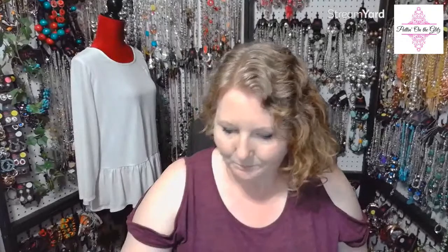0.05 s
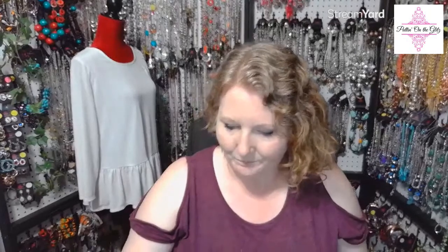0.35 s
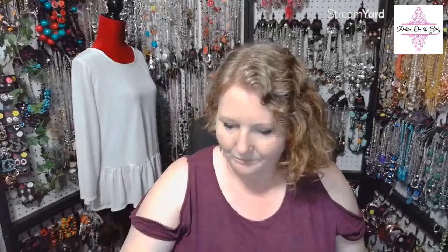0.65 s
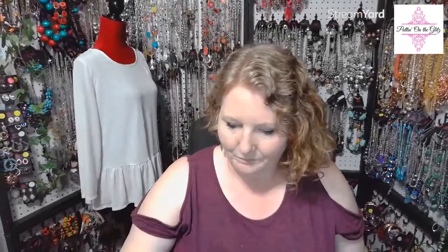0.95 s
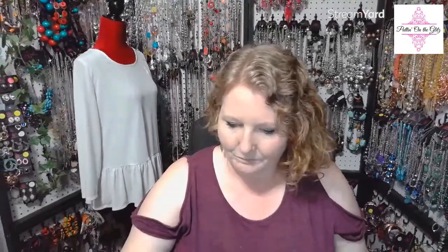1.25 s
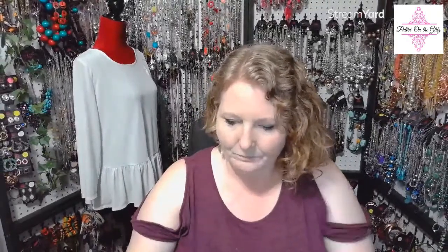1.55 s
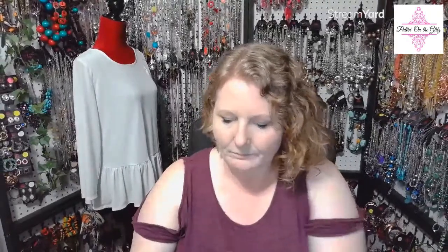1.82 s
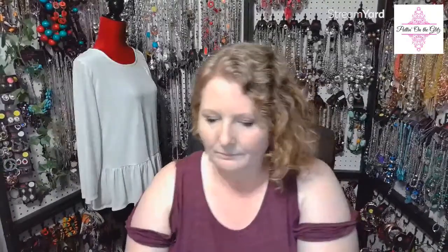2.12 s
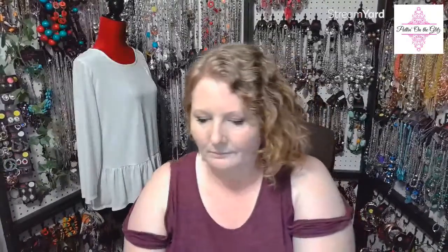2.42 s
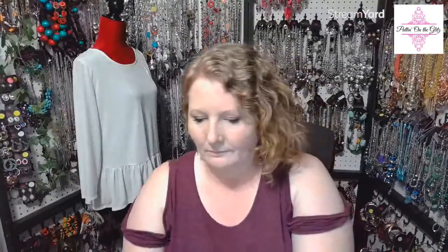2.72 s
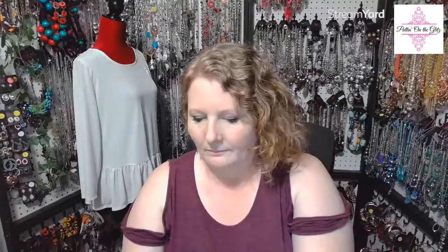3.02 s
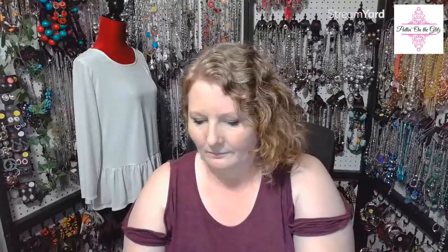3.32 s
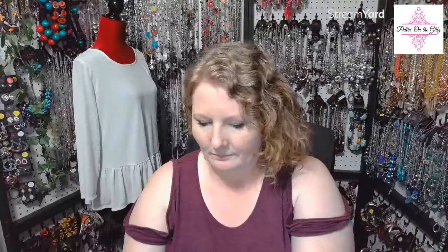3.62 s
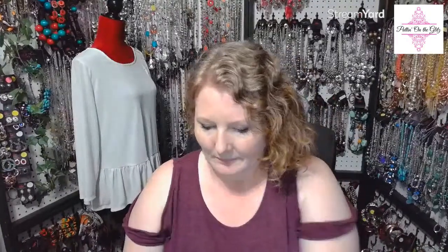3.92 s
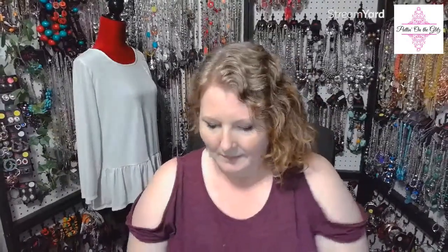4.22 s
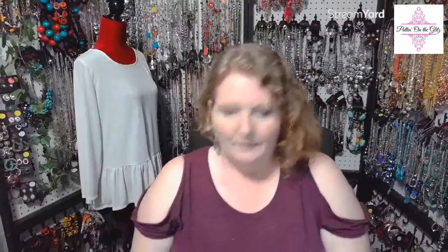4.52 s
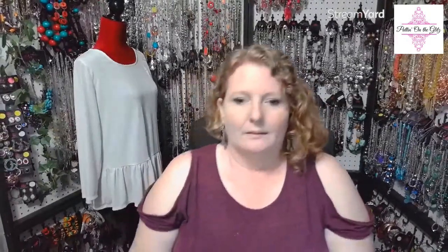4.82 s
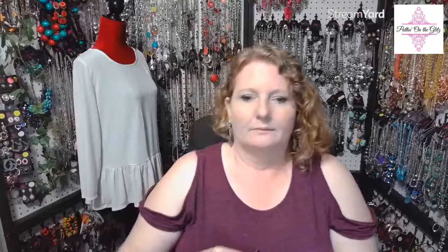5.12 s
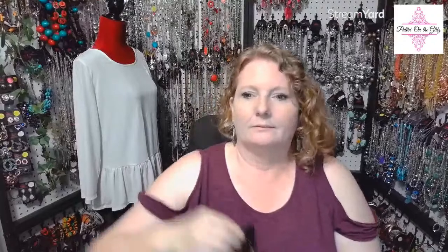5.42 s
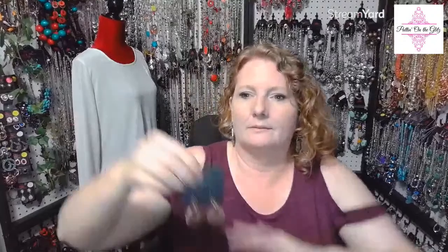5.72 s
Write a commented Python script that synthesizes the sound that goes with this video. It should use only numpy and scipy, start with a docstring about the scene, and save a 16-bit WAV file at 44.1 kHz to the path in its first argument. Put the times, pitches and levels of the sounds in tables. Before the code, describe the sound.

Close, dry handling of jewelry on stiff cards: short scrapes, ticks and taps on a tabletop, then tiny metal drops chiming together.

```python
"""Sorting earrings on a table

Earrings on display cards are sorted by hand, close up, in a small, well-damped room. The cards slide,
tick and knock on the table top, small metal parts ping and the hand bumps the board now and then.
At the end one card is lifted and its two dangling metal drops chime against each other."""
import sys
import numpy as np
from scipy import signal
from scipy.fft import rfft, irfft
from scipy.io import wavfile

SR = 44100
rng = np.random.default_rng(int(sys.argv[2]) if len(sys.argv) > 2 else 0)


def int16_out(signal):
    """Quantize to a 16-bit WAV file."""
    q = np.round(np.clip(np.atleast_2d(signal).T, -1, 1) * 32767)
    wavfile.write(sys.argv[1], SR, q.astype(np.int16))


N = 258184
CUTOFF_HZ = 16000


def from_db(db):
    """Decibels to gain."""
    return 10 ** (np.asarray(db) / 20)


def rms_one(x):
    """Scale to rms 1."""
    return x / np.sqrt(np.mean(x ** 2) + 1e-20)


def unit_energy(x):
    """Scale to a sum of squares of 1."""
    return x / np.sqrt(np.sum(x ** 2) + 1e-20)


def seconds(length):
    """A time axis."""
    return np.arange(int(length * SR)) / SR


def fade(t, t60):
    """Exponential decay, 60 dB in t60."""
    return np.exp(-np.log(1000) * t / t60)


def add(track, start_s, sound):
    """Mix a sound into the track."""
    at = max(int(start_s * SR), 0)
    track[at:at + len(sound)] += sound[:N - at]


def band(x, low_hz, high_hz, order=2):
    """Butterworth band-pass."""
    sos = signal.butter(order, [low_hz, min(high_hz, .45 * SR)], "band", fs=SR, output="sos")
    return signal.sosfilt(sos, x + 1e-18)


def resonate(x, modes):
    """Parallel resonances (pitch [Hz], width [Hz], gain [dB]) with alternating signs."""
    out = 0
    for k, (hz, width, db) in enumerate(modes):
        r = np.exp(-np.pi * width / SR)
        poles = [1, -2 * r * np.cos(2 * np.pi * hz / SR), r * r]
        mode = (1 - r * r) / 2 * signal.lfilter([1, 0, -1], poles, x + 1e-18)
        out = out + (-1) ** k * from_db(db) * mode
    return out


def drift(per_s):
    """A smooth random wobble with rms 1."""
    knots = rng.standard_normal(N // 20)
    return rms_one(np.interp(np.arange(N) / SR * per_s, np.arange(len(knots)), knots))


def ring(hz, t60, rise_s=0.0011):
    """One struck mode, swelling while the contact lasts and then dying away."""
    t = seconds(.45)
    attack = 1 - np.exp(-(t / rise_s) ** 2)
    return np.sin(2 * np.pi * (hz * t + rng.random())) * fade(t, t60) * attack


def jingle(low_hz, high_hz, t60, count):
    """A cluster of inharmonic modes of wire and thin metal."""
    pitches = low_hz * (high_hz / low_hz) ** ((np.arange(count) + rng.random(count)) / count)
    heights = rng.rayleigh(1, count)
    cluster = sum(height * ring(hz, t60) for height, hz in zip(heights, pitches))
    return cluster / np.sqrt(np.sum(heights ** 2) / 2)


def room_tone(noise_db=-70):
    """A steady bed of room noise, microphone hiss and faint mains hum."""
    # noise spectrum: (frequency [Hz], relative density [dB])
    spectrum = [(30, -13), (70, -6.5), (130, -5), (250, -4), (400, -12.5), (600, -17), (1200, -21),
                (2500, -25), (4500, -24.5), (8000, -25.5), (11000, -24.5), (16000, -24)]
    # mains harmonics: (pitch [Hz], rms level [dB])
    harmonics = [(60, -93.5), (120, -80.5), (180, -82), (241, -79), (301, -79)]
    corner_hz, corner_db = np.transpose(spectrum)
    bins_hz = np.fft.rfftfreq(N, 1 / SR) + 1
    colour = from_db(np.interp(np.log(bins_hz), np.log(corner_hz), corner_db))
    noise = rms_one(irfft(rfft(rng.standard_normal(N)) * colour, N))
    t = np.arange(N) / SR
    hum = sum(from_db(db) * np.sin(2 * np.pi * (hz * t + rng.random())) for hz, db in harmonics)
    return from_db(noise_db) * noise + np.sqrt(2) * hum


def reflections(x, predelay_s=0.0014, crossover_hz=3500):
    """Dense reflections from the table and the crowded walls die quickly."""
    t = seconds(.3)
    low = band(rng.standard_normal(len(t)), 100, crossover_hz) * fade(t, t60=0.099)
    high = band(rng.standard_normal(len(t)), crossover_hz, CUTOFF_HZ) * fade(t, t60=0.11)
    return signal.fftconvolve(x, unit_energy((low + high) * (t > predelay_s)))[:N]


def hand_bumps(t60=0.075, rise_s=0.0062, trim_db=-3, shudder_db=-9):
    """Soft bumps move only the lowest modes of the table and leave it shuddering briefly."""
    # the hand meets the table: (time [s], relative level [dB])
    bumps = [(0.596, -42.5), (3.56, -35.5), (3.697, -34.5), (3.953, -37)]
    out, t = np.zeros(N), seconds(.45)
    for start, db in bumps:
        shudder = rms_one(band(rng.standard_normal(len(t)), 75, 300)) * fade(t, t60=0.25)
        thud = ring(172, t60, rise_s) + 0.42 * ring(228, t60, rise_s)
        add(out, start, from_db(db + trim_db) * (thud + from_db(shudder_db) * shudder))
    return out


def table_top(force, place_spread_db, wood_db=-7):
    """The board answers with a few modes over a woody band; where it is struck shifts their balance."""
    # resonances of the board: (pitch [Hz], width [Hz], relative gain [dB])
    board_modes = [(172.8, 170, -15.5), (242, 46, -7), (330, 130, -14.5), (584, 390, -15.5),
                   (780.4, 41, 2.5), (864, 70, 2), (1018, 220, -7), (1218, 45, 0.5), (1314, 120, -2.5)]
    modes = [(hz, width, db + place_spread_db * rng.standard_normal()) for hz, width, db in board_modes]
    wood = from_db(wood_db) * band(force, 470, 1600, order=3)
    return band(resonate(force, modes) + wood, 90, 2400)


def card(force):
    """Stiff cards ring briefly in the upper mids."""
    # resonances of a display card: (pitch [Hz], width [Hz], relative gain [dB])
    card_modes = [(2490, 3560, 7.5), (3300, 1030, 14.5), (3900, 1700, 8.5), (5400, 1600, -0.5)]
    return band(resonate(force, card_modes), 1700, 7400, order=3)


def edges(force, sheen_db=-11, air_db=-20):
    """Hooks and card edges give the crisp top end, strongest in its lower part."""
    sheen = from_db(sheen_db) * band(force, 7950, 12500, order=4)
    air = from_db(air_db) * band(force, 12500, CUTOFF_HZ, order=4)
    return band(force, 6290, 9310, order=4) + sheen + air


def friction(catches_per_s, spread_db, smooth_db, judder_db):
    """A stream of tiny uneven catches over smooth noise, juddering with the pressure of the fingers."""
    sizes = from_db(spread_db * np.minimum(rng.exponential(1, N), 4.5)) * rng.choice([-1, 1], N)
    catches = rms_one(sizes * (rng.random(N) < catches_per_s / SR))
    smooth = from_db(smooth_db) * rng.standard_normal(N)
    return (catches + smooth) * from_db(judder_db * drift(per_s=110))


def loose_parts(force, low_hz, high_hz, width_hz, count, direct=.7, contact_spread_db=5):
    """Narrow resonances of the many small parts come and go as they touch and lift."""
    detune = from_db(rng.normal(0, 0.19, count))  # about 2 % either way
    pitches = np.geomspace(low_hz, high_hz, count) * detune
    contact_db = [contact_spread_db * np.clip(drift(per_s=24), -2, 1.5) for _ in pitches]
    rings = sum(resonate(force, [(hz, width_hz, 0)]) * from_db(db) for hz, db in zip(pitches, contact_db))
    return direct * rms_one(force) + rms_one(rings)


def rubs(half_width=0.078, trim_db=1):
    """A piece drags lightly, swelling and fading in one narrow resonance."""
    # light drags: (start [s], end [s], pitch [Hz], relative level [dB])
    drags = [(0.55, 0.725, 876, -45), (1.162, 1.27, 4020, -38), (2.256, 2.55, 2250, -61.5),
             (2.56, 2.76, 2200, -63), (2.593, 2.668, 3300, -59.5), (4.206, 4.262, 866, -51),
             (4.211, 4.276, 2960, -45), (4.243, 4.545, 1500, -70.5), (4.572, 4.715, 2190, -74),
             (4.655, 4.743, 3020, -68), (5.05, 5.216, 2200, -68.5), (5.347, 5.48, 2450, -72),
             (5.478, 5.579, 3160, -60)]
    out = np.zeros(N)
    force = friction(catches_per_s=2500, spread_db=1, smooth_db=3.5, judder_db=3.5)
    for start, end, hz, db in drags:
        rub = band(force[int(start * SR):int(end * SR)], hz * (1 - half_width), hz * (1 + half_width))
        swell = signal.windows.tukey(len(rub), .7)
        add(out, start, from_db(db + trim_db) * rms_one(rub) * swell)
    return out


def stroke_envelopes(attack_s=.012, sag_db_per_s=20, release_t60=0.11):
    """Scrape and table gains: each stroke gets going, loses pressure and dies once the fingers stop."""
    # a card is pushed or pulled: (start [s], length [s], relative scrape [dB], relative table body [dB])
    strokes = [(0, 0.097, -33.5, -37.5), (0.096, 0.047, -39, -45), (0.204, 0.18, -56, -66),
               (0.351, 0.064, -43.5, -47), (0.395, 0.039, -30.5, -49), (0.445, 0.068, -35, -42.5),
               (0.539, 0.08, -37, -44), (.62, 0.15, -40, -49.5), (.745, .11, -38, -47),
               (0.87, 0.053, -47.5, -59.5), (0.941, 0.34, -48, -62.5), (1.125, 0.083, -39, -50.5),
               (1.171, 0.06, -38, -46.5), (1.523, 0.08, -59, -75.5), (1.641, 0.029, -55, -66),
               (1.728, 0.13, -53.5, -57), (1.803, 0.064, -40.5, -37.5), (1.884, 0.058, -50.5, -47.5),
               (1.998, 0.016, -62, -71), (2.143, .05, -58, -67.5), (2.205, 0.04, -50, -56),
               (2.239, 0.15, -61, -61.5), (2.415, 0.014, -48, -54.5), (2.487, 0.041, -48.5, -58.5),
               (2.579, 0.08, -61, -68), (2.701, 0.078, -49, -64), (2.839, 0.034, -57, -59),
               (2.894, 0.058, -66.5, -78), (2.988, 0.036, -51.5, -48.5), (3.109, .15, -63.5, -71.5),
               (3.28, 0.01, -51, -78), (3.424, 0.13, -48.5, -64), (3.53, 0.047, -34, -36.5),
               (3.602, 0.084, -36.5, -41), (3.638, 0.11, -38, -46.5), (3.79, 0.15, -58, -60.5),
               (3.914, 0.048, -43, -51.5), (3.976, 0.029, -47.5, -67), (4.094, 0.12, -66, -76),
               (4.192, 0.06, -47.5, -57), (4.255, 0.012, -34.5, -63), (4.34, 0.041, -73, -88),
               (4.595, .1, -72, -74.5), (4.689, .03, -57.5, -82), (5.086, 0.28, -71, -71.5),
               (5.201, 0.038, -54.5, -63), (5.232, 0.079, -42, -54.5), (5.427, 0.17, -67.5, -68.5),
               (5.665, 0.13, -73.5, -78)]
    scrape_power, body_power, t = np.zeros(N), np.zeros(N), seconds(.6)
    hold = np.minimum(t / attack_s, 1) * from_db(-sag_db_per_s * t)
    for start, length, scrape_db, body_db in strokes:
        shape = hold * fade(np.maximum(t - length, 0), release_t60)
        add(scrape_power, start, (from_db(scrape_db) * shape) ** 2)
        add(body_power, start, (from_db(body_db) * shape) ** 2)
    return np.sqrt(scrape_power), np.sqrt(body_power)


def small_ticks(scrape_gain, per_s=18, stroke_db=-2.5, finger_db=-68.5, spread_db=6, wire_db=-5):
    """Random dry ticks, faint from the fingers and stronger as a card moves; each rings an ear wire."""
    out, t = np.zeros(N), seconds(.06)
    range_hz = (1900, 6500)
    strength = from_db(stroke_db) * scrape_gain + from_db(finger_db)
    for at in np.flatnonzero(rng.random(N) < per_s / SR):
        gain = strength[at] * from_db(spread_db * rng.standard_normal())
        tick = rms_one(band(rng.standard_normal(len(t)), *range_hz)) * fade(t, t60=0.0092)
        wire = from_db(wire_db) * jingle(*range_hz, t60=0.037, count=4)
        add(out, at / SR, gain * tick)
        add(out, at / SR, gain * wire)
    return out


def sliding(scrape_gain, body_gain, scrape_db=-4.5, body_db=-4, hiss_db=-10):
    """Friction drives the cards, the table under them and the jewellery on them."""
    force = friction(catches_per_s=1800, spread_db=3, smooth_db=-10.5, judder_db=2)
    high_rattle = loose_parts(force, 1683, 11000, width_hz=120, count=40)
    low_rattle = loose_parts(force, 403, 2000, width_hz=150, count=12)
    board = table_top(rms_one(force) + .5 * rms_one(low_rattle), place_spread_db=0.5)
    scrape = from_db(scrape_db) * rms_one(card(high_rattle))
    hiss = from_db(hiss_db) * rms_one(edges(high_rattle, sheen_db=-12.5, air_db=-13.5))
    return scrape_gain * (scrape + hiss) + body_gain * from_db(body_db) * rms_one(board)


def clicks(crumble=0.68, width_hz=900, card_share=0.028, click_trim_db=-1, wire_db=-12, hook_db=-5):
    """Each touch is a spike with a crumbling tail, fed to card, table and edges; wires and hooks ring."""
    # cards and metal fittings touch down, with relative levels:
    # (time [s], contact resonance [Hz], click [dB], table knock [dB], treble snap [dB])
    touches = [(.0256, 4200, -35, -53, -45), (0.0472, 3750, -27.5, -33, -62), (.0714, 3700, -44, -43, -61),
               (.126, 3040, -29.5, -35, -37), (0.1397, 2720, -40, -49, -66),
               (0.1559, 3500, -36.5, -40.5, -43.5), (0.236, 3840, -32.5, -45.5, -63),
               (0.2482, 4700, -34, -44.5, -49), (0.289, 2900, -41.5, -50.5, -53.5),
               (.316, 4000, -48, -58, -62), (.3696, 4700, -37.5, -48, -53.5), (.3934, 3380, -39, -46, -54),
               (.4152, 4320, -33.5, -35, -46), (.4194, 4480, -22, -29, -38.5),
               (0.4336, 4290, -23.5, -30.5, -42.5), (0.5717, 3630, -27, -40, -47),
               (.5954, 3620, -29, -33, -62), (.638, 3950, -30.5, -43.5, -47), (.679, 2810, -38, -38, -45),
               (0.744, 3460, -34.5, -42.5, -56), (.969, 5940, -40, -74, -47),
               (.9814, 4660, -43.5, -74, -54), (1.0466, 3900, -41, -52.5, -71),
               (1.0917, 3900, -41, -51, -57), (1.1555, 3800, -41, -69, -41.5),
               (1.1624, 3990, -29, -42.5, -54), (1.1991, 3920, -36, -45, -35.5),
               (1.241, 4080, -50, -45.5, -35), (1.2978, 3880, -44, -82, -60), (1.565, 5070, -48, -78, -75),
               (1.614, 4030, -49.5, -67, -62), (1.6643, 5460, -44.5, -52, -49.5),
               (1.8162, 3730, -32, -28.5, -39.5), (1.8243, 2900, -36.5, -35, -58.5),
               (1.854, 3700, -36.5, -31.5, -46), (2.0211, 4330, -48, -60, -55.5),
               (2.22, 3700, -42, -46, -51.5), (2.2776, 2340, -51, -55.5, -66),
               (2.767, 2790, -35, -49.5, -54), (2.7717, 2670, -35.5, -60, -53.5),
               (2.8423, 4010, -59, -50, -67), (2.8597, 1830, -37.5, -39.5, -70),
               (2.997, 1980, -52, -57, -60), (3.0146, 2380, -47.5, -45.5, -47.5),
               (3.0287, 2000, -35, -56, -56), (3.0914, 4200, -57, -64, -63),
               (3.152, 4280, -51.5, -60.5, -64), (3.2908, 3600, -43.5, -49.5, -53),
               (3.3141, 2020, -50.5, -46.5, -65), (3.4454, 2680, -38, -57, -61.5),
               (3.471, 3150, -36.5, -58, -55.5), (3.521, 2300, -36, -41, -60),
               (3.5322, 4600, -33, -39, -58), (3.5541, 4470, -18, -34, -41),
               (3.5619, 4300, -39.5, -34, -50), (3.6155, 2970, -41, -42.5, -59),
               (3.629, 5000, -32.5, -41, -47), (3.662, 3170, -27, -32, -38),
               (3.6804, 3900, -25.5, -47, -44.5), (3.6888, 3130, -49.5, -24.5, -48.5),
               (3.7077, 2500, -29, -35, -61.5), (3.7222, 2560, -34, -33.5, -55.5),
               (3.7596, 3650, -40, -53.5, -56), (3.941, 2630, -41.5, -45.5, -58),
               (3.994, 5610, -45.5, -76, -59), (4.208, 3580, -49, -55, -64),
               (4.2611, 3320, -30, -48.5, -42), (4.2671, 2520, -32.5, -46, -47.5),
               (4.356, 3880, -56, -66, -64), (4.369, 3750, -59, -69.5, -62), (4.4, 3630, -66, -68, -78),
               (4.468, 5180, -45, -76, -59), (4.992, 2960, -60, -65.5, -76), (5.085, 3020, -63, -70.5, -77),
               (5.2434, 3970, -56, -56, -45.5), (5.271, 5670, -55, -63, -56), (5.3235, 3180, -34, -45, -49),
               (5.429, 3300, -52.5, -75, -68)]
    out, t = np.zeros(N), seconds(.08)
    hit_gain = np.sqrt(.004 * SR)  # gives unit energy the weight of 4 ms at rms 1
    for start, hz, click_db, knock_db, snap_db in touches:
        force = crumble * rng.standard_normal(len(t)) * fade(t, t60=0.0057)
        force[0] += 1
        contact = band(resonate(force, [(hz, width_hz, 0)]), 1100, 9200)
        contact_and_card = unit_energy(contact) + card_share * unit_energy(card(force))
        board = band(table_top(force, place_spread_db=3), 220, 3000, order=1)
        click = from_db(click_db + click_trim_db) * unit_energy(contact_and_card)
        knock = from_db(knock_db) * unit_energy(board)
        snap = from_db(snap_db) * unit_energy(edges(force))
        wire = from_db(click_db + wire_db) * jingle(0.31 * hz, 0.91 * hz, t60=0.028, count=5)
        hook = from_db(snap_db + hook_db) * jingle(5800, 11000, t60=0.1, count=4)
        add(out, start, hit_gain * (click + knock + snap))
        add(out, start, wire + hook)
    return out


def pings(neighbours_db=-10, overtones_db=-23, cluster_t60=0.091):
    """A small metal part rings on one main mode, among short-lived neighbours and overtones."""
    # metal parts set ringing: (time [s], pitch [Hz], level [dB], t60 [s])
    hits = [(0.237, 4080, -55, 0.032), (1.163, 4240, -36, 0.066), (1.221, 4020, -27, 0.081),
            (1.298, 3550, -72.5, 0.63), (1.398, 3450, -41.5, 0.099), (1.399, 3810, -37.5, 0.074),
            (1.668, 2718, -46.5, 0.18), (2.021, 4640, -46.5, 0.062), (2.022, 6556, -56.5, 0.13),
            (2.167, 4090, -40, 0.016), (2.278, 2347, -35, 0.045), (2.368, 2230, -49, 0.089),
            (2.429, 4570, -38, 0.091), (2.429, 4210, -37.5, 0.087), (2.536, 2910, -45.5, 0.094),
            (2.713, 4188, -41, 0.15), (3.137, 4690, -49, 0.11), (3.223, 3670, -44.5, 0.093),
            (3.26, 3490, -45, 0.095), (3.289, 3840, -44, 0.1), (3.92, 4450, -39, 0.053),
            (4.356, 5787, -53.5, 0.15), (4.468, 4760, -51, 0.03), (4.47, 5717, -45, 0.13)]
    out = np.zeros(N)
    for start, hz, db, t60 in hits:
        neighbours = from_db(neighbours_db) * jingle(.9 * hz, 1.1 * hz, cluster_t60, count=6)
        top_hz = min(3 * hz, CUTOFF_HZ)
        overtones = from_db(overtones_db) * jingle(1.3 * hz, top_hz, cluster_t60, count=24)
        add(out, start, from_db(db) * (ring(hz, t60) + neighbours + overtones))
    return out


def chimes(tick_db=-8, card_db=-26, tick_t60=0.017, splash_db=-7, split_hz=38, twin_db=-7):
    """The drops clash in a splash of crowded high modes; one mode sings on after the others have died."""
    # modes of the drops: (pitch of drop 0 [Hz], pitch of drop 1 [Hz], relative level [dB], base t60 [s])
    drop_modes = [(3984, 4102, 0, .1), (4290, 3967, -9, .06), (5518, 5774, 0, .28), (5771, 5510, -13, .12),
                  (8242, 8330, -7, .04), (9232, 8877, -12, .045)]
    # the drops strike:
    # (time [s], drop [0 or 1], base level [dB], singing mode trim [dB], treble trim [dB], t60 [factor])
    strikes = [(4.723, 1, -38, -8, 7.5, 0.65), (4.734, 1, -34.5, -1.5, 4.5, 0.57),
               (5.242, 0, -28, -35, -4, 0.27), (5.271, 0, -36, 9.5, 8.5, 0.54),
               (5.299, 0, -19, -9.5, -9.5, 0.12), (5.5606, 0, -28, -25, 5.5, 0.42),
               (5.576, 0, -57.5, 10.5, 26, 1.27), (5.624, 1, -78, 22, -16, 1.6),
               (5.747, 1, -31.5, -5.5, 5, 0.47), (5.76, 1, -38, -33, 1.5, 0.65)]
    out = np.zeros(N)
    singing_t60 = max(mode[3] for mode in drop_modes)
    for start, drop, db, sing_db, treble_db, t60_factor in strikes:
        for *pitches, mode_db, base_t60 in drop_modes:
            hz, t60 = pitches[int(drop)], base_t60 * t60_factor
            colour_db = sing_db * (base_t60 == singing_t60) + treble_db * (hz > 7000)
            # a drop is not quite symmetric, so each mode beats with a close twin
            twin = from_db(twin_db) * ring(hz + split_hz, t60 / 2)
            add(out, start, from_db(db + mode_db + colour_db) * (ring(hz, t60) + twin))
        tick = from_db(tick_db) * jingle(3550, 10770, tick_t60, count=70)
        card_tap = from_db(card_db) * jingle(1190, 3810, tick_t60, count=20)
        splash = from_db(splash_db) * jingle(12200, 15700, t60=0.032, count=50)
        add(out, start, from_db(db + treble_db) * (tick + card_tap + splash))
    return out


def scene(click_send_db=-3, slide_send_db=-8, metal_send_db=-12):
    """All the handling, with its reflections, over the quiet room; mono."""
    scrape_gain, body_gain = stroke_envelopes()
    bed, bumps = room_tone(), hand_bumps()
    touches = clicks()
    slides = sliding(scrape_gain, body_gain) + rubs()
    metal = pings() + chimes()
    send = from_db(click_send_db) * touches + from_db(slide_send_db) * slides
    send += from_db(metal_send_db) * metal
    return (bed + reflections(send) + bumps + small_ticks(scrape_gain) + slides + touches + metal)[None]


def record(dry):
    """A steep low-pass cuts the very top."""
    return signal.sosfilt(signal.ellip(10, .3, 70, CUTOFF_HZ, fs=SR, output="sos"), dry)


dry = scene()
out = record(dry)
int16_out(out)
```